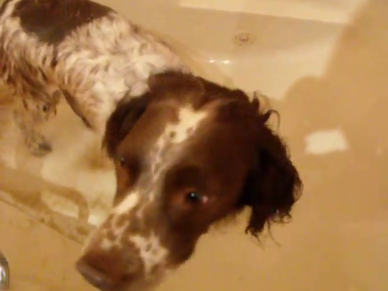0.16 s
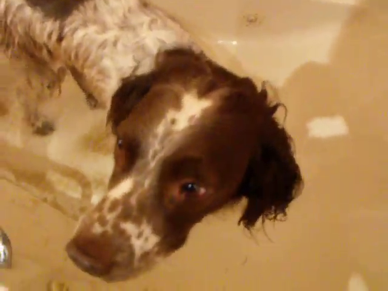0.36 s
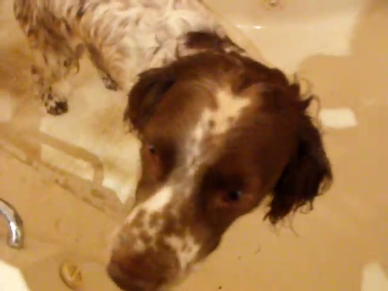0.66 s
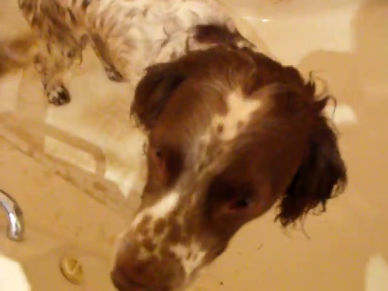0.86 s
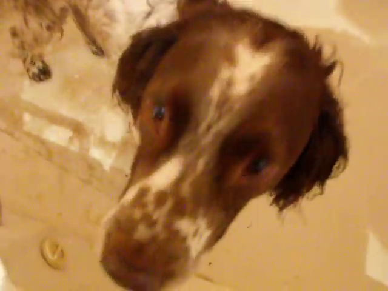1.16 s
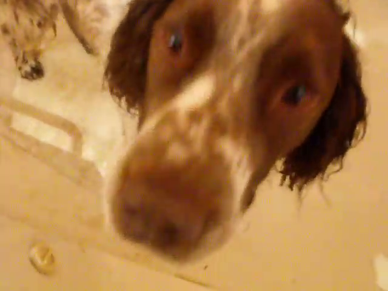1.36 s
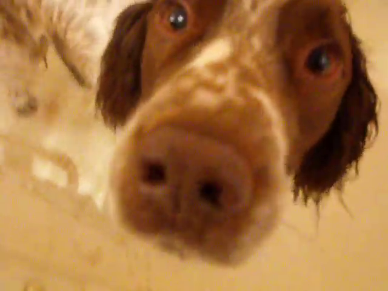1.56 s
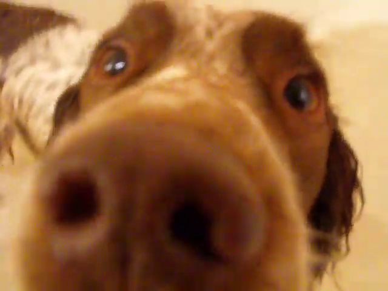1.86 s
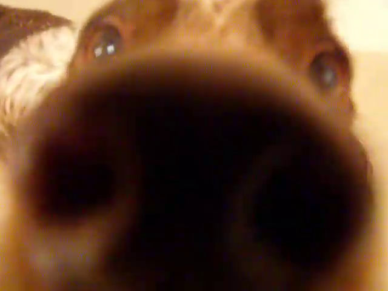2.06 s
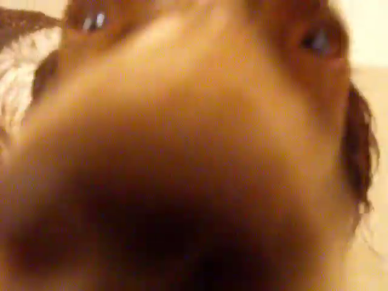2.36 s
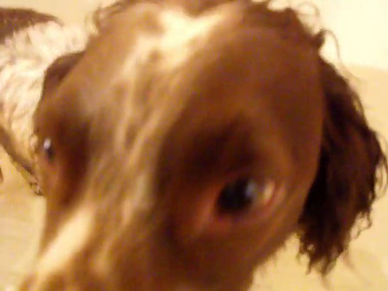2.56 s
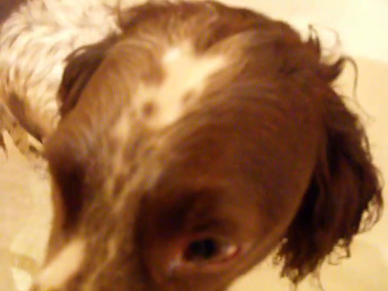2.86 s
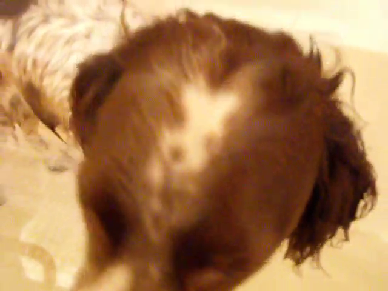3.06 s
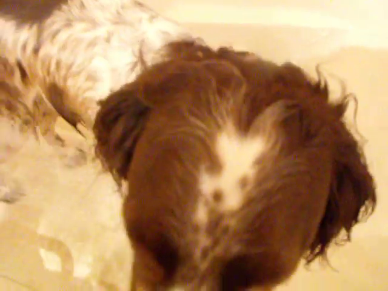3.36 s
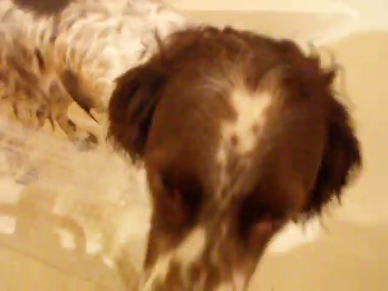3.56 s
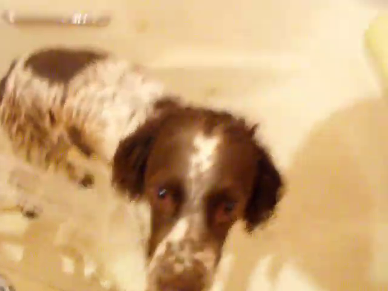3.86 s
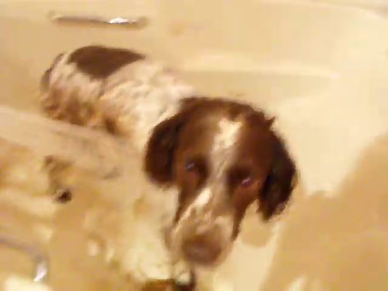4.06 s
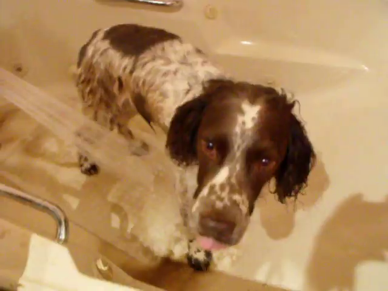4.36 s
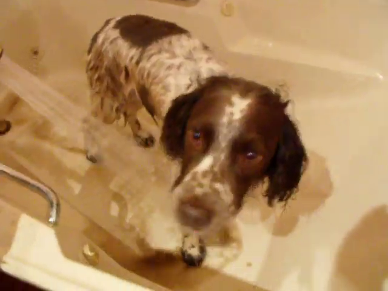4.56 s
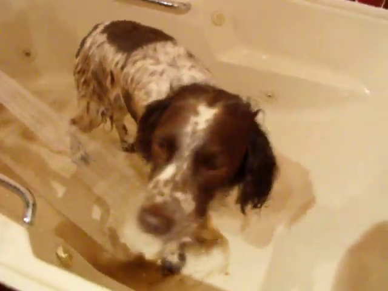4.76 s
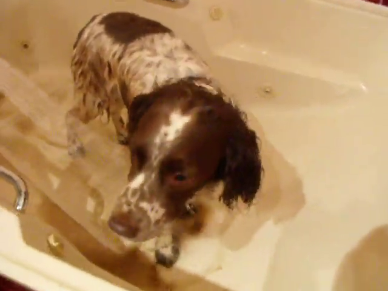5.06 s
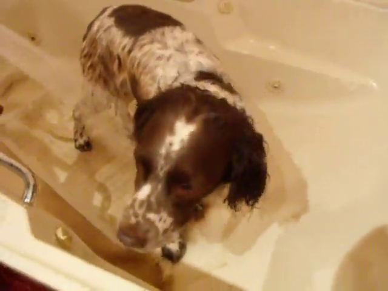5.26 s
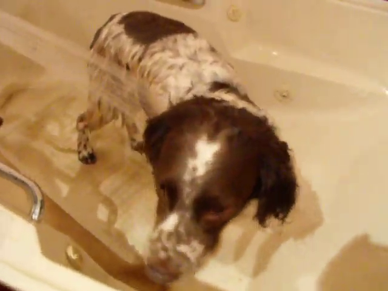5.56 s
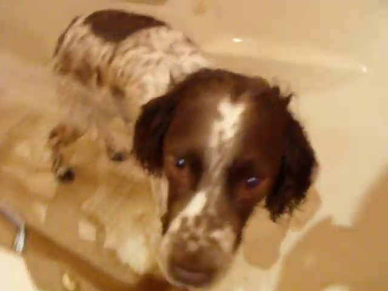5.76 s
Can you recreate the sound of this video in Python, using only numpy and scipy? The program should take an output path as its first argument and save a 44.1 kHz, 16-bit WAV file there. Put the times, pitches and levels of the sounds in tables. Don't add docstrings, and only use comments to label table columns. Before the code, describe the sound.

A hand shower sprays a wet dog standing in a bathtub. Uneven gushes and sharp, clicking splashes come very near for two seconds, with soft heavy paw thumps. A short ragged nose blast with fluttering wet flaps hits the microphone and distorts. Then softer steady spray continues, swelling gently, with one hollow bump and small drips. Short tiled-room echo, no deep treble sparkle.

```python
import sys
import numpy as np
from scipy import signal
from scipy.fft import rfft, irfft
from scipy.io import wavfile
from scipy.ndimage import uniform_filter1d

SR = 44100
rng = np.random.default_rng(int(sys.argv[2]) if len(sys.argv) > 2 else 0)


def nominal_scale(level):
    x = np.asarray(level, float) / 20
    return 10 ** x


def int16_out(signal):
    q = np.round(np.clip(np.atleast_2d(signal).T, -1, 1) * 32767)
    wavfile.write(sys.argv[1], SR, q.astype(np.int16))


N = 261072


def evened(x):
    return x / np.sqrt(np.mean(x ** 2) + 1e-20)


def add(mix, s, sound):
    part = mix[round(s * SR):][:len(sound)]
    part += sound[:len(part)]


def track(rows, axis):
    rows = np.array(rows)
    return np.interp(np.arange(N) / SR, rows[:, 0], rows[:, axis])


def curve(rows, axis):
    t = np.arange(N) / SR
    return nominal_scale(track(rows, axis)) * (t >= rows[0][0]) * (t <= rows[-1][0])


def swells(steady_db, rows):
    swell_db = 12
    t, power = np.arange(0, N / SR, 0.001), 0
    for s, rise, fall, db in rows:
        away = np.maximum((s - t) / max(rise, 0.002), (t - s) / max(fall, 0.002))
        power = power + nominal_scale(2 * (db - swell_db * away))
    return np.sqrt(nominal_scale(2 * steady_db) + np.interp(np.arange(N) / SR, t, power))


def ring(hz, t60, size=4000):
    t = np.arange(size) / SR
    return nominal_scale(-60 * t / max(t60, 1e-3)) * np.sin(2 * np.pi * hz * t)


def stressed(x, hz, width, db):
    turn = np.exp(2j * np.pi * np.cumsum(hz) / SR)
    r = np.exp(-np.pi * width / SR)
    peak = 2 * (turn * signal.lfilter([1 - r], [1, -r], x / turn)).real
    return evened(x + nominal_scale(db) * peak)


def droplets(spectrum, per_s, spread_db, cycles, mist, patchy_db):
    f, db = np.transpose(spectrum)
    landed = rng.random(N) < per_s / SR
    size = nominal_scale(spread_db * np.minimum(rng.exponential(1, N), 2.7)) * landed
    which, out = rng.integers(0, 16, N), np.zeros(N)
    for k, hz in enumerate(np.geomspace(f[1], f[-2], 16)):
        clump = uniform_filter1d(rng.standard_normal(N), 1200)
        clump = evened(uniform_filter1d(clump, 600))
        source = evened(size * (which == k)) + mist * rng.standard_normal(N)
        drop = ring(hz, cycles / hz) * nominal_scale(np.interp(np.log(hz), np.log(f), db)) * hz
        out += signal.oaconvolve(source * nominal_scale(patchy_db * clump), drop)[:N]
    hz = np.fft.rfftfreq(N, 1 / SR)
    edges = 1 / np.sqrt((1 + (f[1] / (hz + 1)) ** 8) * (1 + (hz / f[-2]) ** 8))
    return evened(irfft(rfft(out) * edges, N))


def spray():
    # (frequency [Hz], density [dB per Hz])
    fizz_colour = [(1530, -35), (2600, -2), (2850, -16.5), (3870, 5.5), (4630, -11), (5020, 6), (5400, 0),
                   (5900, 4), (7670, -53.5), (13000, -120)]
    # (frequency [Hz], density [dB per Hz])
    patter_colour = [(710, -35), (1200, 0.5), (1290, -45), (1630, 0), (2180, 3), (2830, 0), (3600, -2.5),
                     (4680, -18), (7920, -120)]
    # (time [s], flow on the fur [dB], share reaching the puddle [dB], brightest colour [Hz])
    jet = [(0.0, -23, -11, 4710), (0.38, -23, -8.5, 4560), (0.47, -28, -6, 4500), (0.6, -50, 4, 4380),
           (0.85, -48.5, -10, 3820), (1.07, -28.5, -6.5, 4130), (1.4, -24.5, -19.5, 4020),
           (1.47, -42, -1, 4220), (1.59, -33.5, -7, 4750), (1.77, -23, -8, 4760), (2.06, -31, -6, 4760),
           (2.36, -27, -7.5, 4210), (3.13, -34, -3.5, 4780), (3.66, -34, -5, 5060), (4.24, -33.5, -5, 4300),
           (5.0, -28, -8.5, 5110), (5.42, -43.5, 4, 4470), (5.92, -32.5, -3, 4600)]
    # (peak time [s], rise [s], fall [s], fizz level [dB], share reaching the puddle
    # [dB])
    jet_gushes = [(0.4, 0.041, 0.046, -27.5, 4.5), (0.499, 0.033, 0.034, -27, 8.5),
                  (0.542, .003, 0.05, -33.5, 13), (0.648, 0.0018, 0.015, -25, 5),
                  (0.69, 0.062, 0.25, -17.5, -9.5), (0.74, 0.076, 0.084, -15, -13.5),
                  (0.805, 0.075, 0.1, -19.5, -6), (0.95, .04, 0.11, -25.5, -3.5),
                  (1.096, 0.0032, 0.015, -12.5, -9.5), (1.128, 0.023, 0.14, -15, -12.5),
                  (1.218, 0.0037, 0.093, -17, -25.5), (1.265, 0.0043, 0.033, -16.5, -11),
                  (1.29, 0.063, 0.12, -15.5, -8), (1.598, 0.0052, 0.062, -32.5, -25),
                  (1.645, .012, 0.085, -17, -28.5), (1.678, 0.0026, 0.052, -25.5, 9),
                  (1.699, 0.049, 0.065, -13.5, -14.5), (2.108, 0.002, 0.2, -31, 15),
                  (2.2, 0.055, 0.095, -23, 9.5),
                  (2.6, 0.049, 0.48, -32, -3.5), (2.751, 0.0062, 0.061, -21, -15),
                  (3.0, .03, 0.11, -28, -18), (3.27, 0.14, 0.26, -29, -30.5),
                  (3.4, 0.13, 0.068, -24, -10.5), (3.5, 0.036, 0.24, -32, -21),
                  (3.706, 0.021, 0.054, -27.5, -27), (3.724, .01, 0.19, -27.5, -4.5),
                  (4.02, 0.022, 0.092, -25.5, -6), (4.12, .04, .06, -40.5, -7),
                  (4.2, .06, 0.076, -30.5, -28), (4.3, 0.04, 0.28, -27.5, -3),
                  (4.355, 0.075, 0.084, -30.5, 0), (4.52, 0.05, 0.1, -25, -16),
                  (4.77, 0.051, 0.1, -32.5, -10.5), (5.16, 0.2, 0.14, -28, -13),
                  (5.3, 0.13, 0.12, -30.5, -6.5), (5.447, 0.017, 0.046, -33.5, 3.5),
                  (5.49, 0.035, 0.16, -27, -5.5), (5.6, 0.011, 0.062, -34.5, 3.5),
                  (5.68, 0.13, 0.099, -31.5, -4)]
    gushes = jet_gushes

    fizz = droplets(fizz_colour, 4000, 1.0, 11.6, 1.6, 1.6)
    fizz = stressed(fizz, track(jet, axis=3), 700, -6.0)
    fizz = np.clip(fizz, -2.7, 2.7)
    patter = droplets(patter_colour, 1500, 2.9, 30.0, 0.97, 2.0)

    flow_db = track(jet, axis=1)
    puddle_db = flow_db + track(jet, axis=2)
    on_fur = swells(flow_db, [(s, rise, fall, db) for s, rise, fall, db, share in gushes])
    in_puddle = swells(puddle_db, [(s, rise, fall, db + share) for s, rise, fall, db, share in gushes])
    return fizz * on_fur + patter * in_puddle


def tub():
    # (frequency [Hz], density [dB per Hz])
    drum_colour = [(250, -37), (420, -3), (478, -0.5), (594, -5.5), (657, 2), (841, 2.5), (1600, -2),
                   (2080, -14), (3520, -120)]
    # (frequency [Hz], density [dB per Hz])
    boom_colour = [(100, -36), (170, -16), (247, -9), (297, 1), (371, 1.5), (437, -25), (520, 3.5),
                   (680, -29.5), (1140, -120)]
    # (frequency [Hz], density [dB per Hz])
    rumble_colour = [(16, -46), (28, -6), (59, -2.5), (140, -2.5), (177, 1), (210, 5), (270, -23.5),
                     (460, -120)]
    # (time [s], slap level [dB], wetted floor note [Hz], note strength [dB])
    floor = [(0.0, -34.5, 770, 1), (0.33, -34, 730, -11.5), (0.4, -27, 970, -31), (0.72, -34, 807, -12),
             (0.98, -41.5, 845, -3), (1.05, -32.5, 705, 5), (1.37, -32.5, 925, -10.5),
             (1.5, -39, 790, -10.5), (1.75, -30.5, 775, 4.5), (2.05, -31.5, 735, 1),
             (2.18, -20, 914, -15.5), (2.47, -36, 783, -4.5), (3.35, -36, 860, -10), (4.15, -38.5, 1107, 3),
             (4.98, -33.5, 893, -20.5), (5.47, -38.5, 938, -1), (5.6, -32, 956, -7),
             (5.92, -35.5, 936, -13.5)]
    # (frequency [Hz], width [Hz], level [dB])
    wall = [(222, 21, -8.5), (335, 36, -12)]
    # (peak time [s], length [s], boom level [dB], rumble below the boom [dB])
    shifts = [(0.182, 0.58, -39, -12), (0.362, 0.23, -37, -17), (0.494, 0.19, -34, -9),
              (0.716, 0.12, -35, -8), (1.047, 0.14, -36.5, -7), (1.134, 0.055, -27, -4),
              (1.254, 0.12, -27.5, -7), (1.612, 0.74, -38.5, -15), (1.7, 0.14, -30.5, -9),
              (2.22, 0.17, -30.5, -7.5), (2.61, 0.18, -43.5, -8), (2.986, 0.15, -44, -14.5),
              (3.164, .07, -39.5, -7), (4.046, 1, -46, -12.5), (4.365, 0.063, -39.5, 6),
              (4.734, 0.3, -40.5, -21), (4.987, 0.16, -40.5, -8), (5.18, 0.24, -40, -28)]
    boom_db, rumble_db = -45.5, -51.5
    follow = 0.45
    shift_rise = 0.85

    slap = droplets(drum_colour, 600, 1.7, 17.7, 2.46, 0.92)
    slap = stressed(slap, track(floor, axis=2), 120, track(floor, axis=3))
    boom = droplets(boom_colour, 440, 0.66, 11.3, 1.27, 1.0)
    for hz, width, db in wall:
        boom = stressed(boom, np.full(N, hz), width, db)
    rumble = droplets(rumble_colour, 220, 4.0, 17.0, 11.0, 0.55)

    water_db = track(floor, axis=1)
    moved_db = follow * (water_db - water_db.mean())
    boom_swells = [(s, shift_rise * d, d, db) for s, d, db, under in shifts]
    rumble_swells = [(s, shift_rise * d, d, db + under) for s, d, db, under in shifts]
    booming = swells(boom_db + moved_db, boom_swells)
    rumbling = swells(rumble_db + moved_db, rumble_swells)
    return slap * nominal_scale(water_db) + boom * booming + rumble * rumbling


def hums():
    # (middle time [s], length [s], level [dB], note [Hz])
    wall_notes = [(0.33, 0.1, -41.5, 314), (0.395, 0.092, -31, 361), (0.487, 0.057, -37, 310),
                  (0.532, .1, -32, 576), (0.652, 0.15, -34.5, 317.5), (1.133, 0.099, -32, 222),
                  (1.251, 0.21, -28.5, 285.7), (1.703, 0.18, -35.5, 223.7), (1.792, .2, -29, 743),
                  (1.869, 0.079, -33, 582), (1.898, .08, -29.5, 828), (1.96, 0.11, -41, 744),
                  (2.017, 0.119, -34, 732), (2.074, 0.072, -36, 746), (2.099, .13, -30.5, 592),
                  (2.123, .08, -36.5, 996), (2.199, 0.18, -26, 292.3), (2.247, 0.083, -25, 790),
                  (4.72, 0.16, -39, 233), (4.82, .2, -40, 334.4), (5.508, 0.038, -32, 2150),
                  (5.086, 0.1006, -39, 222), (5.15, 0.18, -37, 339), (5.645, 0.096, -30.5, 808),
                  (5.72, 0.09, -38, 1310)]
    out = np.zeros(N)
    for s, length, db, hz in wall_notes:
        u = np.arange(0, length, 1 / SR)
        bulge = np.sin(np.pi * u / length) ** 2
        add(out, s - length / 2, nominal_scale(db) * bulge * np.sin(2 * np.pi * hz * u))
    return out


def splats():
    # (time [s], peak level [dB], high ring [Hz], low ring [Hz])
    near_blobs = [(0.3118, -1, 4800, 3050), (0.4676, -2.5, 4550, 3330), (0.4784, -10.5, 5340, 2000),
                  (0.5026, -22, 4770, 3030), (0.5408, -15, 4680, 2400), (0.5607, -7, 4330, 3130),
                  (0.6445, -7, 5350, 2300), (0.9233, -20, 3840, 2530), (0.9493, -6, 3400, 3160),
                  (0.9762, -1.5, 3960, 2520), (1.0264, -1.5, 4500, 2690), (1.054, -4, 4940, 2800),
                  (1.0945, -1.5, 3330, 3030), (1.1131, -5.5, 4820, 2710), (1.1258, 2, 3760, 3020),
                  (1.2163, -11, 4300, 2870), (1.2618, 5.5, 4180, 2360), (1.417, -17, 3900, 1720),
                  (1.514, -31, 5000, 2510), (1.534, -10.5, 5150, 2920), (1.597, -15, 4940, 2400),
                  (1.6343, -14, 4640, 2990), (1.6762, 1, 4900, 2030), (2.0104, -12, 4630, 2740),
                  (2.1067, 0, 3330, 2060), (2.1147, -10, 3070, 2230)]
    # (time [s], peak level [dB], high ring [Hz], low ring [Hz])
    far_blobs = [(2.3178, -3, 3870, 2050), (2.5197, -25, 3740, 3190), (2.5716, -8, 3800, 3050),
                 (2.5934, -3, 3800, 3180), (2.6563, -12, 3340, 2260), (2.7063, -13.5, 4120, 3140),
                 (2.7487, -8, 3700, 3100), (2.9086, -7.5, 3640, 2460), (2.9921, -11, 3530, 3260),
                 (3.1513, -11, 3610, 2920), (3.2166, -11.5, 4760, 2430), (3.283, -6.5, 5320, 2660),
                 (3.492, -9, 3700, 2980), (3.5434, -12.5, 3200, 3210), (3.6791, -12, 5440, 2790),
                 (3.703, -12.5, 5230, 2920), (3.8387, -7.5, 5000, 2050), (4.0098, -9.5, 3300, 3200),
                 (4.0165, -5, 4000, 3140), (4.2963, -8, 4810, 2800), (4.504, -5, 3990, 3100),
                 (5.437, -21, 2600, 2320), (5.488, -6, 4200, 1900), (5.595, -7, 3360, 2500),
                 (5.8517, -15, 5200, 1850)]
    kinds = ((near_blobs, -1.3, -10, 0.032), (far_blobs, -12.5, 3.9, 0.04))
    out, t = np.zeros(N), np.arange(8000) / SR
    band = signal.butter(2, [1800, 6500], "bandpass", fs=SR, output="sos")
    for rows, base_db, db_per_khz, t60 in kinds:
        for s, db, high_hz, low_hz in rows:
            low_db = base_db + db_per_khz * (low_hz / 1000 - 2)
            hit = ring(high_hz, 0.019) + nominal_scale(low_db) * ring(low_hz, 0.032)
            hit += 0.82 * ring(5300, 0.011) + 0.18 * ring(3000, 0.0036)
            add(out, s, nominal_scale(db - 10.5) * hit)
            spatter = signal.sosfilt(band, rng.standard_normal(len(t)))
            add(out, s + 0.0019, nominal_scale(db - 20.5 - 60 * t / max(t60, 0.01)) * spatter)
    return out


def spurts():
    # (time [s], level [dB], colour [Hz], t60 [s])
    puffs = [(0.3552, -18, 4800, 0.019), (0.389, -25, 4700, .02), (0.3992, -19, 4580, .04),
             (0.4915, -8, 5200, 0.022), (0.5402, -13.5, 5240, 0.02), (0.5412, -20, 3000, 0.024),
             (0.544, -25, 2200, 0.056), (0.5595, -13.5, 5260, 0.022), (0.6445, -11.5, 5200, 0.02),
             (0.645, -19.5, 2720, 0.026), (1.094, -19, 5000, 0.033), (1.1125, -8.5, 5000, 0.11),
             (1.123, -10, 3960, 0.11), (1.124, -13.5, 2300, 0.073), (1.142, -19, 3900, 0.094),
             (1.16, -10.5, 5000, 0.059), (1.2154, -7.5, 4240, 0.039), (1.223, -10, 4700, 0.062),
             (1.2615, -12.5, 2320, 0.083), (1.281, -12, 4300, .03), (1.299, -17.5, 4740, 0.032),
             (1.326, -23, 3900, 0.089), (1.418, -17, 3900, 0.026), (1.514, -25, 4900, .04),
             (1.597, -18.5, 4680, 0.084), (2.114, -9, 3560, 0.044), (2.12, -24, 4400, 0.027),
             (2.146, -12, 1700, 0.072), (2.156, -12, 1580, .1), (2.188, -9, 2350, 0.042),
             (2.195, -15, 3900, 0.05), (2.24, -5.5, 3900, 0.029), (2.257, -12.5, 3680, .03),
             (2.589, -15.5, 3920, .03), (2.598, -20, 3500, 0.063), (2.621, -23, 3620, 0.045),
             (2.703, -24.5, 3020, 0.058), (2.746, -28.5, 3700, 0.072), (2.754, -22, 5100, 0.13),
             (3.702, -21, 5130, 0.054), (3.711, -22, 5240, .1), (3.713, -32, 3330, .2),
             (3.721, -32, 2200, .1), (3.752, -29, 3500, 0.17), (3.771, -28, 3020, 0.19),
             (4.295, -28.5, 2300, 0.32), (4.313, -25.5, 4300, 0.33), (4.36, -24, 4680, 0.093),
             (5.453, -27.5, 4880, 0.16), (5.56, -32, 1500, .5)]
    half_width = 0.26 / 2
    out, t = np.zeros(N), np.arange(8000) / SR
    onset = np.minimum(t / 0.00077, 1)
    for s, db, hz, t60 in puffs:
        limits = [hz * (1 - half_width), hz * (1 + half_width)]
        band = signal.butter(2, limits, "bandpass", fs=SR, output="sos")
        puff = evened(signal.sosfilt(band, rng.standard_normal(len(t))))
        add(out, s, nominal_scale(db - 60 * t / max(t60, 0.01)) * onset * puff)
    return out


def ticks():
    # (time [s], peak level [dB], ring [Hz])
    drops = [(0.356, -6, 4750), (0.3982, 0, 4570), (0.468, -7, 5030), (0.4795, -5, 5200),
             (0.5416, -5, 2980), (0.5598, -9, 5160), (0.644, -6, 2900), (0.6448, 0, 5270),
             (0.69, -2.5, 4830), (0.7025, 0, 4300), (0.715, -4, 4180), (0.743, -2, 4000), (0.771, -2, 4100),
             (0.9515, -4, 3520), (0.9755, 1.5, 3910), (0.996, -11, 4000), (1.0246, -2, 4800),
             (1.0455, -11, 4500), (1.0702, -12, 3200), (1.0944, 0, 5000), (1.142, 1, 3730),
             (1.181, -12, 5000), (1.2166, 0, 4310), (1.3003, -7, 4770), (1.418, -14, 3950),
             (1.514, -16, 4970), (1.5975, -15, 4660), (1.63, -0.5, 4630), (1.634, 1, 4690),
             (1.6986, -4.5, 4850), (1.726, 1, 4700), (1.6766, 3, 2120), (1.6781, -2, 2860),
             (2.105, 2, 3130), (2.148, -7.5, 2130), (2.213, -2, 2320), (2.2235, -0.5, 3880),
             (2.26, -1, 3670), (2.291, -5, 3000), (2.3184, -10, 3900), (2.5705, -8, 4000),
             (2.589, -14, 3900), (2.7495, -5, 3700), (3.285, -7, 5130), (3.493, -18, 3530),
             (3.5427, -17, 3150), (3.7032, -12, 5350), (3.7125, -11, 5200), (3.7215, -13, 3270),
             (3.838, -14, 5000), (4.009, -14.5, 3260), (4.3135, -13, 4300), (4.368, -15, 4740),
             (5.4435, -8, 3180), (5.597, -17, 3430)]
    out = np.zeros(N)
    onset = np.minimum(np.arange(4000) / SR / 0.0005, 1)
    for s, db, hz in drops:
        add(out, s, nominal_scale(db - 3.0) * ring(hz, 0.0075) * onset)
    return out


def slaps():
    # (time [s], peak level [dB], ring [Hz])
    hits = [(0.371, -1.5, 4740), (0.3903, 2, 4760), (0.4938, -11, 5430), (0.5041, 6.5, 4870),
            (1.1159, 0.5, 4710), (1.1218, -1.5, 3830), (1.1432, 1, 3240), (1.1631, -6, 4170),
            (1.2171, 2.5, 4570), (1.2263, 1.5, 3410), (1.2369, 5.5, 4930), (1.2464, 0.5, 4750),
            (1.2631, 6, 3850), (1.2811, 5.5, 4570), (1.2992, -22, 4730), (1.673, -12, 5060),
            (1.692, -6, 4000), (1.7, 5, 3000), (1.7073, -3, 4030)]
    out = np.zeros(N)
    for s, db, hz in hits:
        add(out, s, nominal_scale(db - 5.5) * ring(hz, 0.0059))
    return out


def thuds():
    # (time [s], peak level [dB], wall note [Hz], t60 [s])
    paws = [
        (0.457, -39, 81, 0.21),
        (1.103, -13.5, 74, 0.23),
        (1.221, -8.5, 72, 0.19),
        (4.336, -12, 119, 0.13),
        (4.334, -9, 174, 0.08),
        (4.338, -23, 65, 0.2),
        (4.47, -33, 45, 0.44),
        (5.68, -34, 40, 0.36),
        (5.87, -30, 45, 0.3),
    ]
    out, t = np.zeros(N), np.arange(16000) / SR
    for s, db, hz, t60 in paws:
        soft = 1 - np.exp(-t / 0.044)
        add(out, s, nominal_scale(db - 6.0) * ring(hz, t60, size=len(t)) * soft)
    return out


def snort():
    # (time [s], breath force [dB])
    breath = [
        (2.095, -36.5),
        (2.104, -26.5),
        (2.1065, -5.5),
        (2.139, -4),
        (2.205, -14.5),
        (2.211, -3.5),
        (2.353, -39.5),
        (2.36, -30),
    ]
    # (frequency [Hz], width [Hz], level [dB])
    cavities = [(1330, 54, -10.5), (1560, 38, 3), (1700, 300, 5), (2096, 120, 10), (2315, 57, -7),
                (2620, 64, -4), (3330, 110, -31), (4300, 130, -2.5), (4750, 29, -8)]
    # (time [s], peak level [dB], ring [Hz])
    flaps = [(2.107, -12.5, 3330), (2.1156, 4, 3620), (2.121, 4, 4240), (2.128, 4.5, 4300),
             (2.133, -9.5, 4300), (2.143, 1, 3720), (2.148, 5, 3520), (2.1539, 9, 3350),
             (2.1668, 7.5, 3500), (2.1766, 2.5, 4130), (2.1874, -1, 3520), (2.195, 4.5, 3870),
             (2.2013, 6.5, 3760), (2.2093, 9.5, 4140), (2.2233, 4, 4330), (2.241, 6.5, 3850),
             (2.2494, 2, 4380), (2.26, 3.5, 3650), (2.2727, 3.5, 3900), (2.293, 2, 3730)]
    roughness = evened(uniform_filter1d(rng.standard_normal(N), 120))
    air = rng.standard_normal(N) * nominal_scale(0.81 * roughness)
    nose = sum(nominal_scale(db) * np.sqrt(width) * ring(hz, 3.6 / (0.96 * width)) for hz, width, db in cavities)
    voiced = evened(signal.oaconvolve(air, nose)[:N])
    hiss = evened(signal.oaconvolve(air, ring(4400, 0.0028, size=400))[:N])
    out = (voiced + nominal_scale(-21.0) * hiss) * curve(breath, axis=1) * nominal_scale(-7.5)
    for s, db, hz in flaps:
        add(out, s, nominal_scale(db - 3.5) * (ring(hz, 0.0042) + 0.2 * ring(5.4 * hz, 0.0011)))
    return out


def drips():
    # (time [s], peak level [dB], bubble [Hz])
    bubbles = [
        (4.304, -25, 1090),
        (5.3465, -29.5, 460),
        (5.3465, -27, 620),
        (5.3465, -30, 850),
        (5.912, -24.5, 2330),
    ]
    out, t = np.zeros(N), np.arange(16000) / SR
    for s, db, hz in bubbles:
        add(out, s, nominal_scale(db + 2.5 - 60 * t / 0.034) * np.sin(2 * np.pi * hz * t * (1 + 3 * t)))
    return out


def bathroom(x):
    taps, at = np.zeros(SR // 2), np.arange(150, SR // 2 - 22, 22)
    sign = rng.choice([-1., 1.], len(at))
    taps[at + rng.integers(0, 22, len(at))] = sign * nominal_scale(-60 * at / SR / 0.18)
    return signal.oaconvolve(x, taps / np.linalg.norm(taps))[:N]


def scene():
    small = signal.butter(2, 900, "highpass", fs=SR, output="sos")
    near = signal.sosfilt(small, splats() + slaps() + snort())
    water = spray() + tub() + spurts() + ticks() + drips()
    mono = water + hums() + thuds() + near + nominal_scale(-6.0) * bathroom(near)
    return np.array([mono, mono])


def low_pass(x):
    return signal.sosfilt(signal.butter(12, 15900, fs=SR, output="sos"), x)


def record(dry):
    converter_limit, overload, offset = 0.85, 0.72, -0.0026
    edge = signal.firwin(161, 5656, window=("kaiser", 11), fs=SR)[None]
    saturated = np.clip(dry, -converter_limit, converter_limit)
    narrow = signal.oaconvolve(saturated, edge, "same")
    finished = np.clip(narrow + offset, -overload, overload)
    return low_pass(finished)


dry = scene()
out = record(dry)
int16_out(out)
```